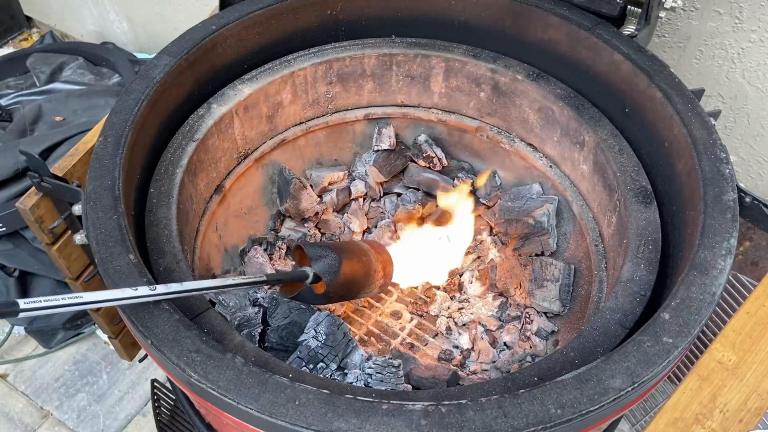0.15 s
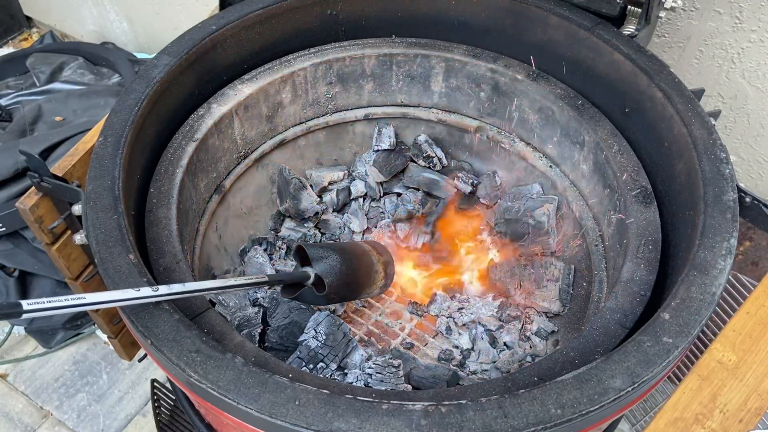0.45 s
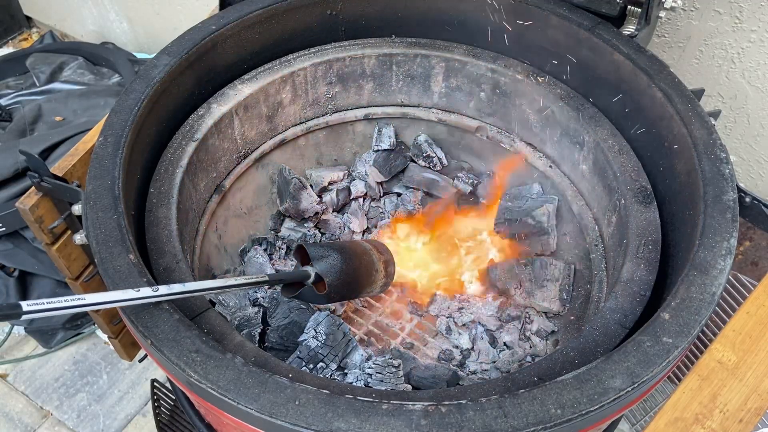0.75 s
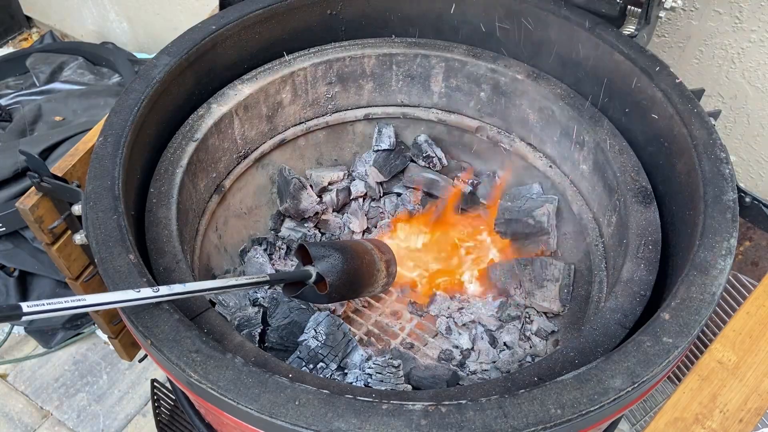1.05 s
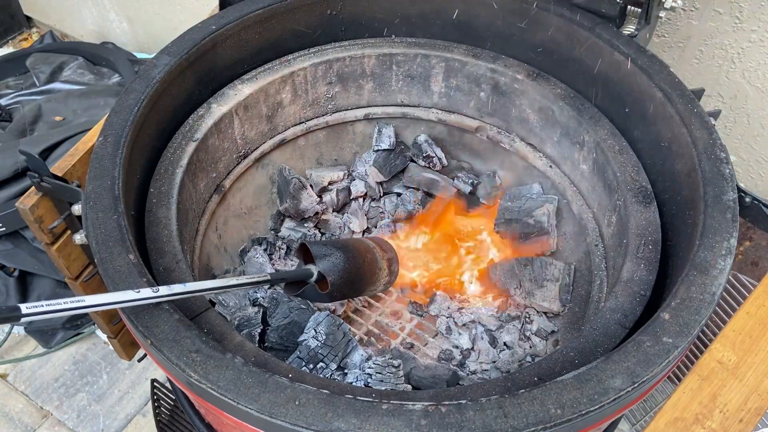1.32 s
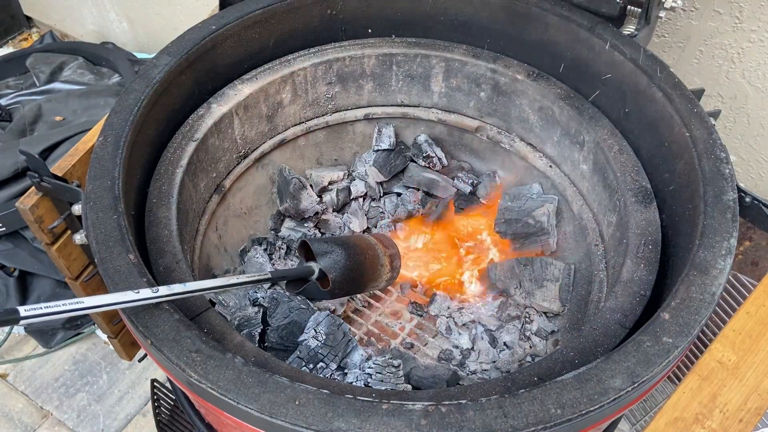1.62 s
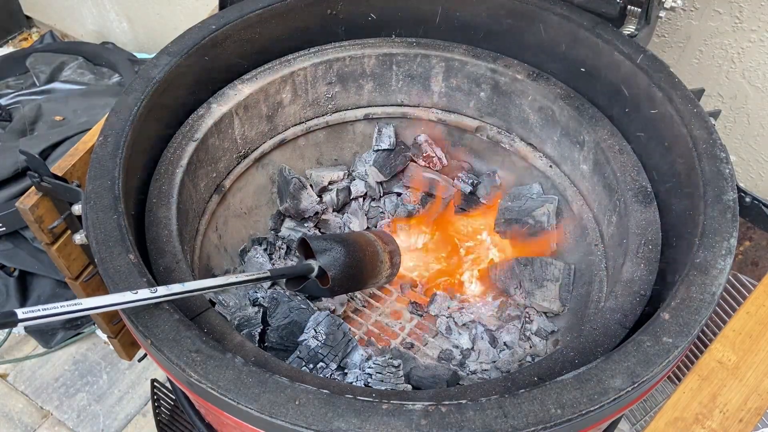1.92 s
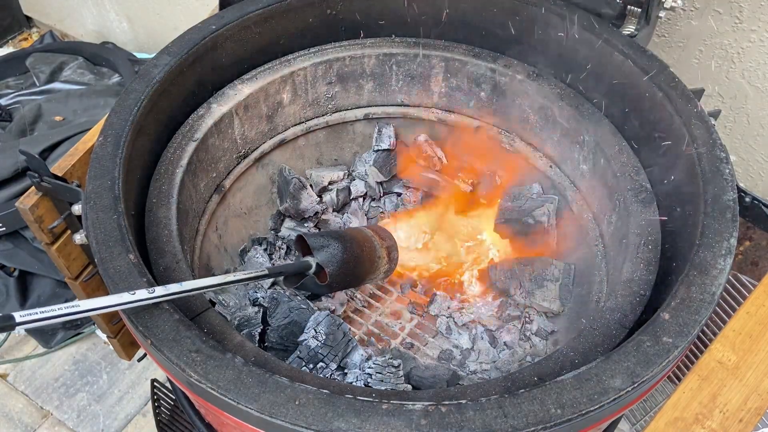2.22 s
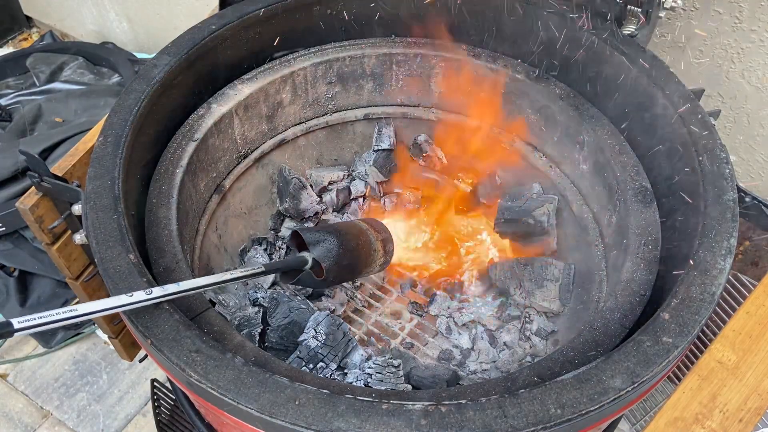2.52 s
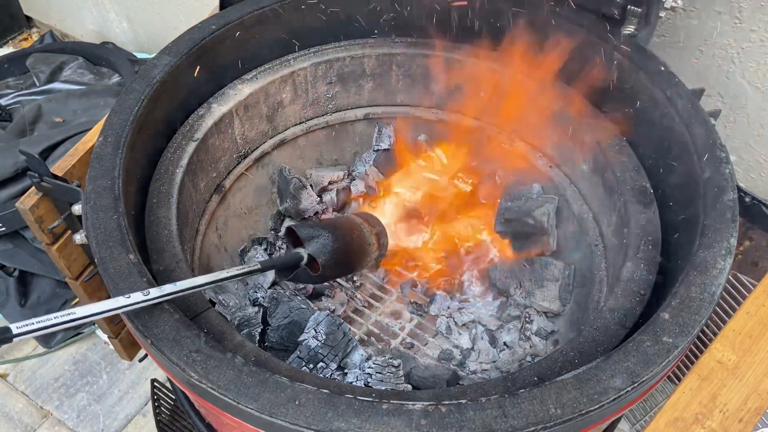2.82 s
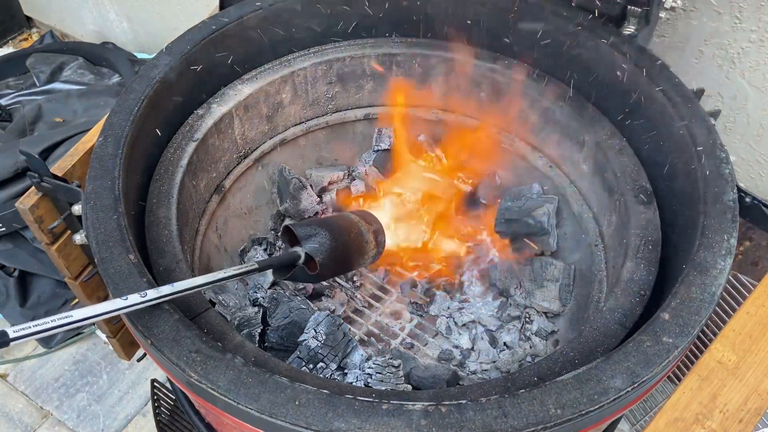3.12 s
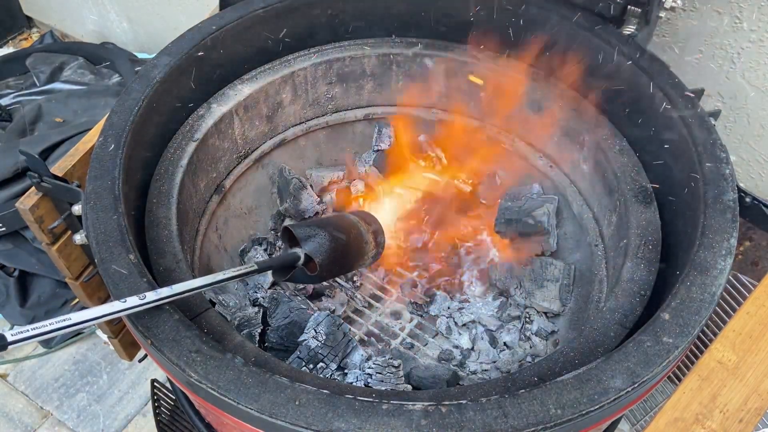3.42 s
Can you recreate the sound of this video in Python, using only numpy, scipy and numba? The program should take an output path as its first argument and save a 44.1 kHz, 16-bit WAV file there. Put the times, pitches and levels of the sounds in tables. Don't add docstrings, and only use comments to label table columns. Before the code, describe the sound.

A gas torch starts almost silent over a faint outdoor murmur and wind, then surges by 0.2 s into a deep, hollow, turbulent roar ringing in a ceramic bowl. A fainter hiss, slight whistles and tiny spark ticks ride on top. The hiss swells near 2 s; from about 2.3 s the torch swings and the ringing shifts, slightly weaker after 3 s, still roaring at the 3.5 s end. Close stereo.

```python
import sys
import numpy as np
from scipy import signal
from scipy.fft import rfft, irfft
from scipy.io import wavfile
from numba import njit

SR = 44100
rng = np.random.default_rng(int(sys.argv[2]) if len(sys.argv) > 2 else 0)


def unload_wav(signal):
    wavfile.write(
        sys.argv[1],
        SR,
        np.round(np.clip(np.atleast_2d(signal).T, -1, 1) * 32767).astype(np.int16),
    )


def nominal_scale(level):
    x = np.asarray(level, float) / 20
    return 10 ** x


N = 156555


def rms_one(x):
    return x / np.sqrt(np.mean(x ** 2) + 1e-20)


def in_time(rows):
    start_s, *columns = np.transpose(rows)
    time_s = np.arange(N) / SR
    return [np.interp(time_s, start_s, column) for column in columns]


def at_hz(points, hz):
    pitch_hz, value = np.transpose(points)
    return np.interp(np.log(hz), np.log(pitch_hz), value)


def filtered(x, hz, kind):
    return signal.sosfilt(signal.butter(2, hz, kind, fs=SR, output="sos"), x)


def drift(rate_hz):
    r = np.exp(-80 * np.pi * rate_hz / SR)
    slow = signal.lfilter([1], [1, -2 * r, r * r], rng.standard_normal(N // 40 + 2002))
    slow = rms_one(slow[2000:])
    return np.interp(np.arange(N) / 40, np.arange(len(slow)), slow)


def spread(mid, side, hz, aim=0.):
    # pitch_hz, likeness (0-1)
    likeness = [(30, 1), (130, .98), (290, .96), (640, 0.91), (1410, 0.93), (3100, 0.67), (5500, 0.96),
                (6700, .97)]
    # pitch_hz, left_minus_right_db
    lean = [(60, .5), (150, 1), (270, 2), (400, -5), (740, 9), (1200, 1), (2000, 0), (5000, 5)]
    alike = at_hz(likeness, hz)
    alike = np.clip(alike + (1 - alike) * 0.49 * aim, 0, .999)
    half_lean_db = at_hz(lean, hz) / 2
    shared = np.sqrt(1 + alike) * mid
    opposed = np.sqrt(1 - alike) * side * [[1], [-1]]
    return nominal_scale(np.array([[half_lean_db], [-half_lean_db]])) * (shared + opposed) / np.sqrt(2)


def centre(hz, width_hz):
    r = np.exp(-np.pi * width_hz / SR)
    return 2 * r * np.cos(2 * np.pi * hz / SR), r


@njit
def resonate(x, pull, r):
    y = np.zeros_like(x)
    for i in range(2, len(x)):
        y[i] = x[i] - x[i - 2] + pull[i] * y[i - 1] - r * r * y[i - 2]
    return y


def rings(table, aim, flicker_db, wander):
    out = 0
    for hz0, hz1, width_hz, db0, db1 in table:
        hz1 = np.clip(hz1, .86 * hz0, 1.06 * hz0)
        hz = (hz0 + (hz1 - hz0) * aim) * (1 + wander * drift(2.96))
        pull, r = centre(hz, 1.56 * width_hz)
        pair = []
        for noise in rng.standard_normal((2, N)):
            once = resonate(noise, pull, r)
            pair.append(rms_one(resonate(once, pull, r)))
        level_db = db0 + (db1 - db0) * aim + flicker_db * drift(9)
        out = out + nominal_scale(level_db) * spread(*pair, hz0, aim)
    return out


def bands(spectrum, low_hz, octaves, patchy_db):
    white = rng.standard_normal((2, 2, N))
    edges = low_hz * 2 ** np.arange(0, octaves, .5)
    for k, (low, high) in enumerate(zip(edges, edges[1:])):
        hz = np.sqrt(low * high)
        level_db = at_hz(spectrum, hz) + patchy_db * drift(8.9)
        mid, side = filtered(white[k % 2], [low, high], "band") * nominal_scale(level_db)
        yield hz, mid, side


def bowl(aim):
    # aim0_hz, aim1_hz, width_hz, aim0_db, aim1_db
    bowl_modes = [(124, 147, 49, -15.5, -12.5), (136, 156, 44.4, -2, 0), (233, 228.4, 34.7, -5, -7),
                  (261.3, 277, 32.7, -7, -2), (382.5, 373, 20.3, -16, -30.5), (484, 480, 90, -20, -12),
                  (581.5, 642, 81, -11, -27.5), (837, 754, 170, -20, -30.5)]
    return rings(bowl_modes, aim, flicker_db=0.91, wander=0.018)


def nozzle(aim):
    # aim0_hz, aim1_hz, width_hz, aim0_db, aim1_db
    nozzle_modes = [(987, 935, 120, -15.5, -32), (1086, 1078, 32, -17, -11.5),
                    (1147, 1180, 47.5, -8.5, -22.5), (1202.5, 1280, 43, -17, -25)]
    return rings(nozzle_modes, aim, flicker_db=1.5, wander=0.0071)


def bell(aim):
    # aim0_hz, aim1_hz, width_hz, aim0_db, aim1_db
    bell_modes = [(1380, 1490, 160, 0.5, 8), (1555, 1587, 92, -0.5, 9), (1870, 1980, 320, 9, 5),
                  (2520, 2330, 134, 6, 1.5), (3390, 3180, 230, -0.5, 2), (4460, 4200, 160, -9, -4),
                  (5450, 4960, 360, -6.5, -5)]
    return rings(bell_modes, aim, flicker_db=1.3, wander=0.024)


def flame(aim):
    # pitch_hz, level_db (per Hz)
    flame_noise = [(25, -57), (60, 7.5), (100, -3.5), (330, -5), (800, -5.5), (1800, -16.5), (3000, -19),
                   (6000, -32.5)]
    layers = bands(flame_noise, 21.6, 8.6, patchy_db=2.0)
    return rms_one(sum(spread(mid, side, hz, aim) for hz, mid, side in layers))


def hollow(x, aim):
    # aim0_hz, aim1_hz, width_hz, depth (0-1)
    hollows = [(177.6, 186.6, 27.7, 0.66), (308.5, 327, 36, 0.9), (774, 860, 42, .4), (1280, 1470, 89, 0.3),
               (1590, 1740, 54, .65), (2100, 1940, 50, 0.04), (2930, 2900, 690, 0.19)]
    for hz0, hz1, width_hz, depth in hollows:
        pull, r = centre(hz0 + (hz1 - hz0) * aim, width_hz)
        ringing = np.array([resonate(port, pull, r) for port in x])
        x = x - depth * (1 - r * r) / 2 * ringing
    return x


def spark_ticks():
    sparks_per_s = 230
    ticks = (rng.random(N) < sparks_per_s / SR) * rng.choice([-1, 1], N)
    ticks = ticks * nominal_scale(3.7 * np.minimum(rng.exponential(1, N), 4))
    return rms_one(filtered(ticks + 1e-18, 3500, "high"))


def other_port(near):
    agree_hz, step_hz = 6850, 4180
    dwell = .3
    turns = (np.fft.rfftfreq(N, 1 / SR) - agree_hz) / step_hz
    turns = turns - dwell * np.sin(4 * np.pi * turns) / (4 * np.pi)
    return irfft(rfft(near) * np.exp(-2j * np.pi * turns), N)


def jet(aim):
    # pitch_hz, level_db (per Hz)
    jet_noise = [(3500, -3), (5500, -0.5), (6500, 2.5), (8000, 4.5), (10000, 4.5), (12000, 4.5),
                 (14000, -.5), (16000, 6)]
    # aim0_hz, aim1_hz, width_hz, aim0_db, aim1_db
    whistle_modes = [(7200, 6850, 130, -15, -17), (8300, 8050, 130, -19, -23), (9900, 9800, 600, -15, -14),
                     (12300, 12200, 700, -15, -13)]
    layers = bands(jet_noise, 3340, 2.6, patchy_db=2.1)
    pair = sum(np.array([mid, side]) for hz, mid, side in layers)
    hiss, own = rms_one(pair) * np.sqrt(2)
    gust_db = .4 * drift(8) + .8 * drift(40) + .5 * drift(200)
    whistles = rings(whistle_modes, aim, flicker_db=4.5, wander=0.011).mean(axis=0)
    near = hiss * nominal_scale(gust_db) + nominal_scale(-27) * spark_ticks() + whistles
    only_right = nominal_scale(-17 + gust_db) * own
    return np.array([other_port(near), near + only_right])


def yard():
    # pitch_hz, level_db (per Hz)
    yard_noise = [(18, -33), (30, -23), (246, -7), (773, -15), (869, -4), (1150, 1), (1520, -42),
                  (2730, -18), (8000, -36), (10400, -66), (17600, -120)]
    layers = bands(yard_noise, 37.6, 7.6, patchy_db=0.5)
    murmur = rms_one(sum(spread(mid, side, hz) for hz, mid, side in layers))
    wind = rms_one(filtered(rng.standard_normal((2, N)), [45, 110], "band"))
    return nominal_scale(-40) * murmur + nominal_scale(-39.5 + 2.7 * drift(2.7)) * wind


def scene():
    # start_s, roar_db, aim (0-1), nozzle_db, bell_db
    gas_flow = [(0, -36.5, 0.1, -7, 3), (.1, -32.5, 0.1, 5.5, -11), (.15, -14.5, 0.32, 1.5, -4),
                (.22, -10, 0, 0, 4), (.5, -11, 0.1, -1, 0.5), (.8, -11.5, 0.04, 0, 0.5),
                (1.1, -12.5, 0.16, 1, 3.5), (1.25, -13, 0.36, -2.5, 3), (1.6, -11.5, 0.27, -1, 4),
                (2.0, -9, 0.43, -1.5, 1), (2.3, -11.5, 0.68, 1.5, 6.5), (2.5, -13.5, 0.9, -2.5, 3.5),
                (2.62, -13, 0.93, -2, 0.5), (2.82, -11, 1, -8, -0.5), (3.1, -14, 1, 0, 3),
                (3.3, -17.5, 0.9, -5, 0), (3.46, -15.5, 0.75, -2.5, -2), (3.55, -16, 0.74, -21, -3)]
    # start_s, hiss_db
    strike = [(0.0, -60), (0.09, -57), (0.14, -43), (0.2, -38.5), (0.79, -41), (0.94, -45), (1.03, -41),
              (1.04, -44), (1.29, -44.5), (1.97, -33), (2.11, -38), (2.45, -34), (2.47, -36.5),
              (2.69, -36.5), (2.73, -40), (2.87, -34.5), (3.09, -39.5), (3.55, -42)]
    roar_db, aim, nozzle_db, bell_db = in_time(gas_flow)
    strike_db, = in_time(strike)
    swing_db = strike_db - roar_db + 24

    torch = nominal_scale(roar_db) * bowl(aim)
    torch = torch + nominal_scale(roar_db + nozzle_db) * nozzle(aim)
    torch = torch + nominal_scale(roar_db - 30.5 + bell_db + 0.48 * swing_db) * bell(aim)
    torch = torch + nominal_scale(roar_db - 9 + 0.89 * swing_db) * flame(aim)
    surge = nominal_scale(0.05 * drift(5) + 0.87 * drift(45))
    torch = surge * hollow(torch, aim)

    torch[1] = aim * torch[1] + (1 - aim) * np.roll(torch[1], 1)
    return torch + nominal_scale(strike_db + 3) * jet(aim) + yard()


def top_cut(x):
    return signal.sosfilt(signal.butter(12, 17080, fs=SR, output="sos"), x)


def record(dry):
    ceiling, cutoff_hz = .97, 15750
    size = np.abs(dry) / ceiling
    held = dry / (1 + size ** 4) ** .25
    cut = signal.sosfilt(signal.ellip(12, .3, 60, cutoff_hz, fs=SR, output="sos"), held)
    return top_cut(cut)


dry = scene()
out = record(dry)
unload_wav(out)
```